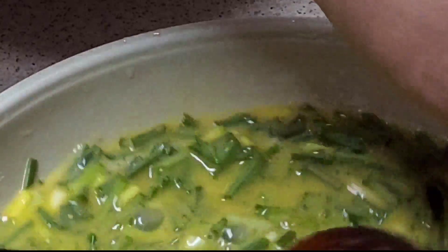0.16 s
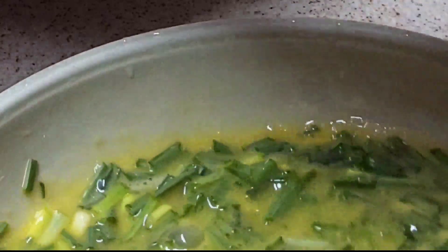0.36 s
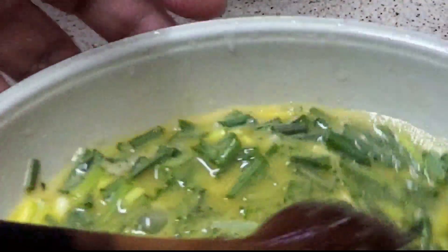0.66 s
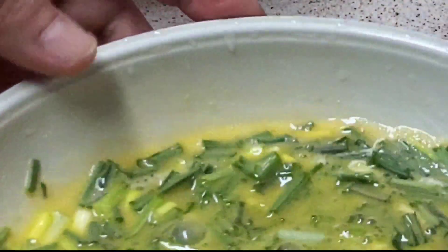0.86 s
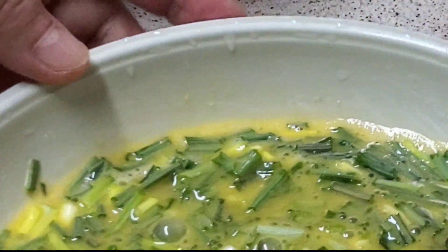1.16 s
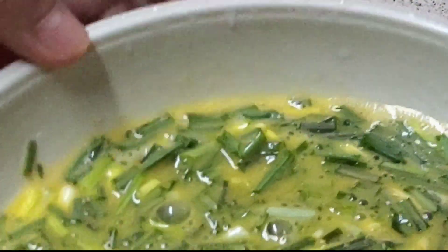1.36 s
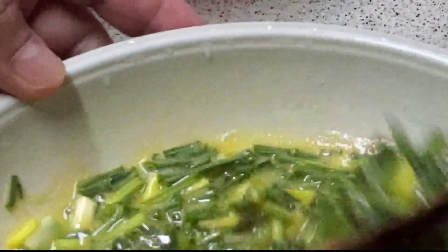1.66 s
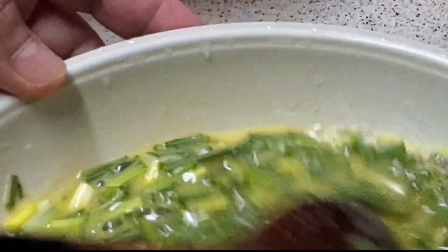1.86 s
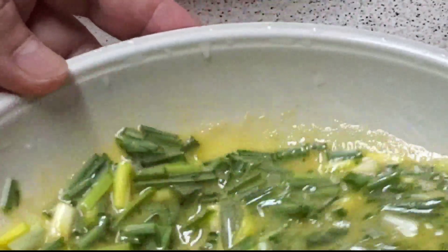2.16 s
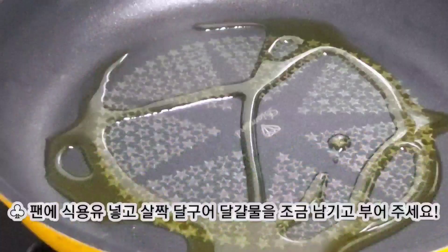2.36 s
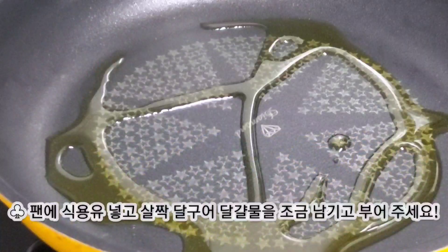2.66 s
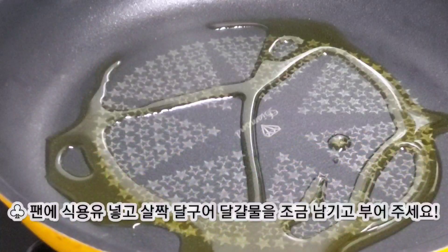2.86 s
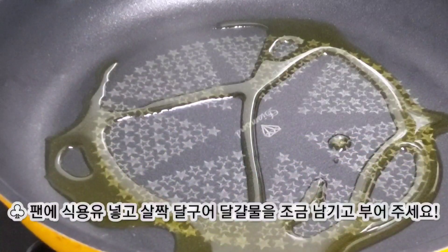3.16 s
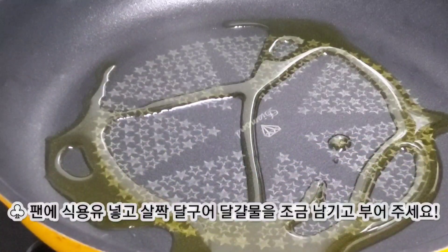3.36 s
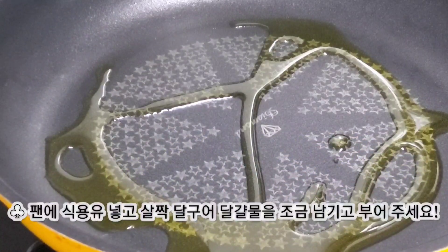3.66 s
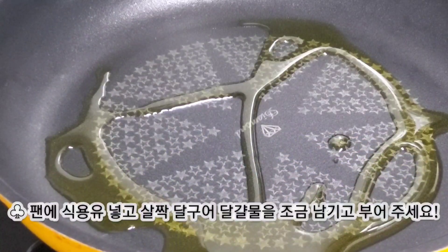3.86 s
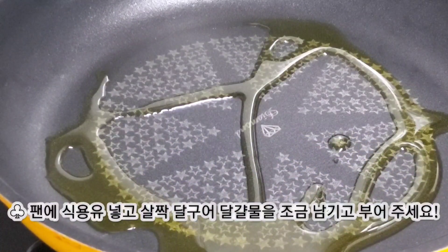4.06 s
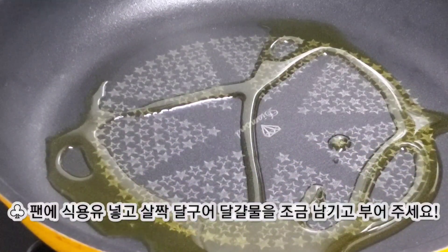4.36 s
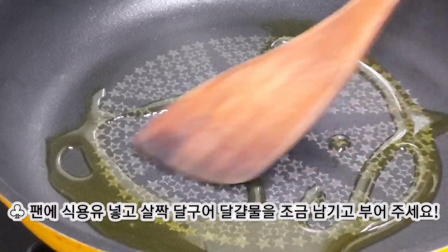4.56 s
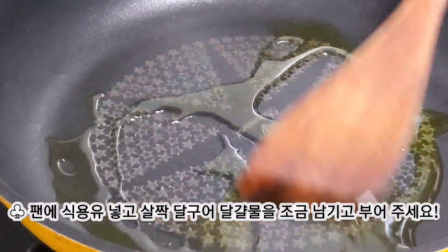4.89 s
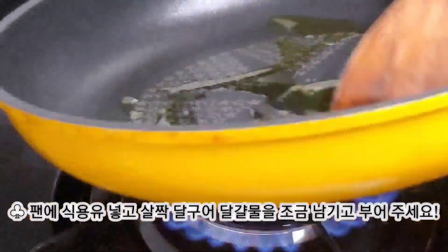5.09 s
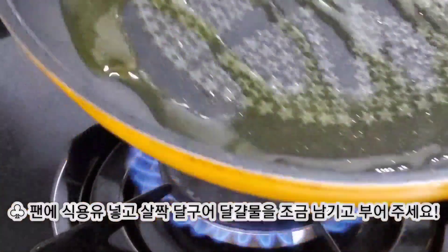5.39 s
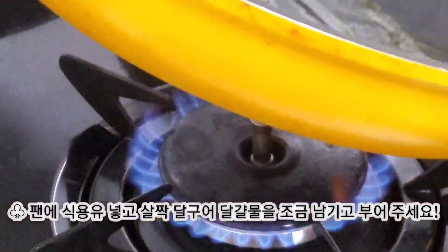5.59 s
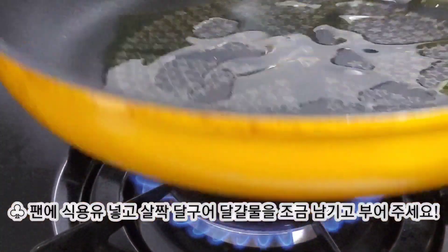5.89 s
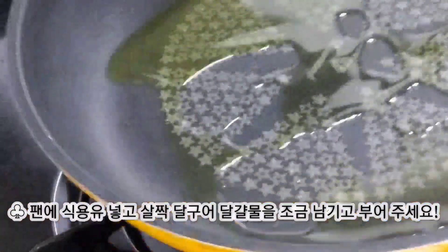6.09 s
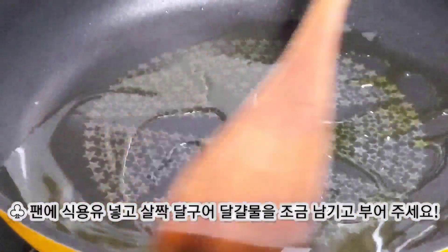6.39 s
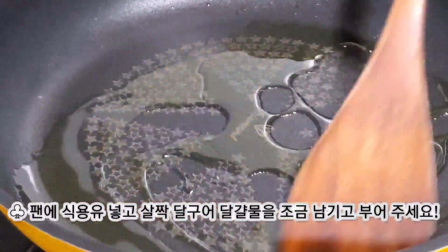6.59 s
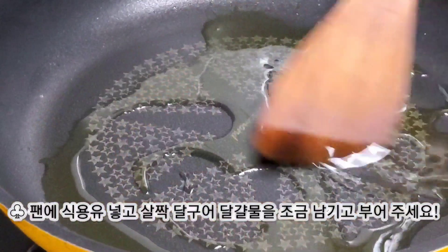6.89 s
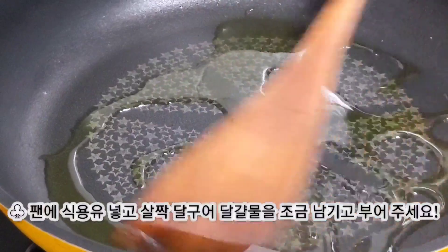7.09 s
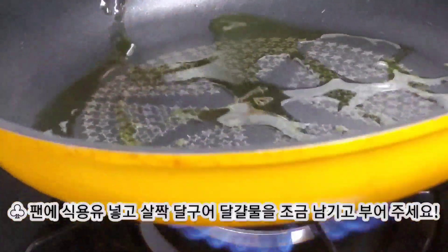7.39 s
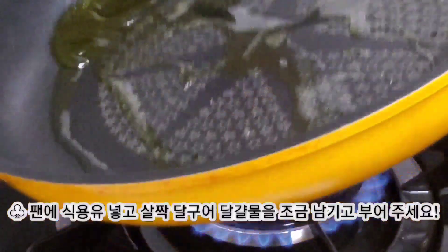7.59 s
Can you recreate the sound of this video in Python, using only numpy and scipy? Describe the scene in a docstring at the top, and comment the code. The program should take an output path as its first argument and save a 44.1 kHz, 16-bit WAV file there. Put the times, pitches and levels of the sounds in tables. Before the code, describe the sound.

Close up in a small kitchen, a wooden spoon knocks roughly every quarter second on a bowl while thick egg and chopped greens swish and crackle wetly. The sound cuts to a quiet burner hiss, a brief rattle and thud on the counter, then a wooden spatula knocking and scraping a pan, a ringing metallic rub as it tilts, and more taps and scrapes.

```python
"""Egg in a bowl, then a pan on the stove

A wooden spoon knocks on a bowl between wet swishes of egg and chives: noise bursts and bubble grains
excite the bowl's modes. Then, by a hissing gas burner, something lands on the counter and a wooden spatula
taps and scrapes an oiled pan by stick-slip friction; the pan clanks and rubs on its iron grate when tilted.
Early copies and a short diffuse tail set it in a small kitchen, over shaped background noise.
"""
import sys
import numpy as np
from scipy import signal
from scipy.fft import rfft, irfft, next_fast_len
from scipy.io import wavfile
from scipy.ndimage import uniform_filter1d, map_coordinates

SR = 44100
rng = np.random.default_rng(int(sys.argv[2]) if len(sys.argv) > 2 else 0)


def int16_out(signal):
    """Quantize to a 16-bit WAV file."""
    q = np.round(np.clip(np.atleast_2d(signal).T, -1, 1) * 32767)
    wavfile.write(sys.argv[1], SR, q.astype(np.int16))


N = 341334
TIME = np.arange(N) / SR

# edges of the registers thud, knock, clack and tick: edge_hz
BAND_EDGES = [50, 300, 1500, 5000, 15000]
# resonances of the bowl: mode_hz, width_hz, level_db
BOWL_MODES = [(235, 45, -6), (337, 68, -1.5), (617, 51, -12.5), (840, 86, -13), (1190, 48, -12),
              (1780, 140, -13), (2180, 250, -17.5), (2770, 25, -32), (3510, 36, -13), (4230, 330, -17.5),
              (5330, 80, -17), (6540, 48, -57), (7640, 83, -21.5), (8500, 66, -30)]
# dense, damped response under the bowl's resonances: frequency_hz, level_db
BOWL_BODY = [(30, -20.5), (80, -3.5), (160, -4), (400, -9.5), (700, -16), (1100, -12), (1600, -18),
             (3000, -22), (6000, -36), (11000, -33.5), (16000, -52)]
# resonances of the pan lying flat: mode_hz, width_hz, level_db
PAN_MODES = [(121, 43, 8.2), (496.0, 56, 0.5), (937, 99, 1), (1507, 43, -7.5), (2284, 74, 2.5),
             (3296, 250, -15.0), (4300, 220, -19.5), (5380, 66, -19.5), (5660, 63, -21.5),
             (6500, 68, -38.0), (6960, 140, -25.0)]
# dense, damped response under the pan's resonances: frequency_hz, level_db
PAN_BODY = [(30, -27.5), (70, -17), (170, 2.5), (240, -5.5), (330, -6.5), (600, -7.5), (1050, -11),
            (1500, -7), (2000, -18.5), (3000, -40.5), (5000, -26.5), (8000, -34.5), (12000, -39),
            (16000, -66)]
# spatula strokes: start_s, length_s, drag_db, growth_db (over the stroke),
# then above the drag: judder_db, grit_db, rim_db; and the blade's note at the start: note_hz
SCRAPES = [(4.72, .125, -43.5, -1, 2.5, -0.5, 0, 650), (4.855, 0.085, -34, 6, -11, -6.5, -3, 650),
           (4.965, 0.023, -40, -3.5, 3.5, 1.5, 1, 850), (5.015, 0.049, -48.5, 1, 8.5, -8, -6, 700),
           (5.068, 0.031, -31.5, -2, -11, -6.5, -12, 915), (5.14, 0.033, -28, 6.5, -3.5, -6, -12.5, 958),
           (5.205, .05, -32.5, 1, -7, -20, -17.5, 580), (6.44, 0.053, -38.5, -9, -4.5, -6, -4, 904),
           (6.584, 0.063, -41, -10, -5, -9.5, -1.5, 691), (6.67, 0.067, -45, -7.5, 0, 2, -8.5, 820),
           (6.777, 0.063, -36.5, 4, -14, -9.5, -5, 840), (6.897, 0.085, -35, -3, -14, -12, -10, 676),
           (7.039, 0.043, -34, 4, -14, -13, -19, 565), (7.135, 0.064, -36, -3.5, -1.5, -9.5, -7.5, 711),
           (7.233, .085, -47, -4.5, 4, 2, 5.5, 844), (7.328, 0.037, -34, -4.5, -12, -15.5, -9.5, 842),
           (7.43, 0.021, -45, -19, -2, 4, -4, 730), (7.533, 0.087, -44.5, -2.5, -0.5, -10.5, -16, 478)]
# left-right likeness of near sounds: frequency_hz, likeness (1 = identical)
NEAR_LIKENESS = [(60, 0.97), (140, 0.99), (300, 0.9), (600, 0.68), (1200, 0.093), (3000, 0.0389),
                 (8000, 0.052)]
# left-right likeness of the backgrounds and the room's tail: frequency_hz, likeness (1 = identical)
DIFFUSE_LIKENESS = [(60, 1), (130, 0.95), (290, 0.76), (640, 0.35), (1410, 0.051), (3100, -0.039),
                    (6820, -0.013), (15000, -0.08)]


def amp(db):
    """Level to amplitude: 20 dB is a factor of ten."""
    return 10 ** (np.asarray(db) / 20)


def unit(x):
    """Normalisation to rms 1."""
    return x / np.sqrt(np.mean(x ** 2) + 1e-20)


def along(points, hz):
    """Interpolation of (Hz, value) points on a logarithmic frequency axis."""
    f, v = np.transpose(points)
    return np.interp(np.log(hz + 1), np.log(f + 1), v)


def wobble(rate):
    """Smooth random modulation: a spline through rate random knots a second."""
    knots = rng.standard_normal(int(N * rate / SR) + 4)
    return map_coordinates(knots, [TIME * rate])


def shaped(x, gain):
    """Minimum-phase filtering: the response to a cause rings after it, never before."""
    n = x.shape[-1]
    half = next_fast_len(n // 2 + 4096)
    magnitude = np.maximum(gain(np.fft.rfftfreq(2 * half, 1 / SR)), 1e-6)
    cepstrum = irfft(np.log(magnitude))
    # folding the cepstrum onto positive times makes the response causal
    cepstrum[1:half] *= 2
    cepstrum[half + 1:] = 0
    return irfft(rfft(x, 2 * half) * np.exp(rfft(cepstrum)))[..., :n]


def body(broad, modes):
    """Modal response: the powers of resonance peaks add to a broad, damped response."""
    def gain(f):
        peaks = sum(amp(db) ** 2 / (1 + (2 * (f - hz) / width) ** 2) for hz, width, db in modes)
        return np.sqrt(amp(along(broad, f)) ** 2 + peaks)
    return gain


def hump(hz, centre_hz, lift_db, sharpness):
    """Single broad resonance on a log-frequency axis: a peak of lift_db added to unit gain."""
    return 1 + amp(lift_db) / (1 + (sharpness * np.log((hz + 1) / centre_hz)) ** 2)


def band(x, lo_hz, hi_hz):
    """Band-pass filtering: one register of a sound, at rms 1."""
    edges_hz = [lo_hz, min(hi_hz, SR / 2.1)]
    return unit(signal.sosfilt(signal.butter(3, edges_hz, "band", fs=SR, output="sos"), x))


def widen(pair, alike):
    """Interaural coherence: shared and opposed noise mix to the given left-right likeness."""
    likeness = lambda f: np.clip(along(alike, f), -.99, .99)
    mid = shaped(pair[0], lambda f: np.sqrt(1 + likeness(f)))
    side = shaped(pair[1], lambda f: np.sqrt(1 - likeness(f)))
    return np.array([mid + side, mid - side])


def placed(x, left_db):
    """Interaural level difference: left_db louder on the left, or on the right if negative."""
    return x * amp(np.array([[left_db], [-left_db]]) / 2)


def bowl():
    """Struck resonator: the spoon knocks on the bowl, whose ring is damped by the egg."""
    # knocks: time_s, knock_db, thud_db (above the knock), hardness_hz, spot_hz (pitch of the struck spot),
    # t60_s (of the contact)
    knocks = [(0.12, -41.5, -4.5, 4770, 445, 0.018), (0.405, -33.5, -5.5, 11000, 970, 0.11),
              (0.603, -40.5, 3, 6740, 496, 0.032), (0.731, -47, -23, 2640, 1250, 0.12),
              (0.937, -32, -9, 8500, 1000, 0.03), (1.203, -37, 1.5, 2980, 830, 0.11),
              (1.409, -54.5, 7, 1970, 626, 0.041), (1.609, -63, 26.5, 2500, 555, 0.012),
              (1.631, -67, 29, 5000, 541, 0.052), (1.789, -31, -2.5, 1550, 695, 0.06)]
    return blows(knocks, BOWL_BODY, BOWL_MODES, clack_db=-8, tick_db=-15.5, spot_db=-0.5,
                 crack_db=16, tail_db=-14.0, tail_t60=0.17, attack=0.0015)


def blows(rows, broad, modes, clack_db, tick_db, spot_db, crack_db, tail_db, tail_t60, attack):
    """Impact excitation: a brief noisy force drives the modes; spot and hardness set pitch and colour."""
    out, t = np.zeros((2, N + SR)), np.arange(SR // 4) / SR
    for s, knock_db, thud_db, hardness_hz, spot_hz, t60 in rows:
        # a fast burst, then the clatter of nearby surfaces
        decay = amp(-60 * t / t60) + amp(tail_db - 60 * t / tail_t60)
        push = decay * (1 - np.exp(-t / attack))
        force = widen(push * rng.standard_normal((2, len(t))), NEAR_LIKENESS)
        force[:, SR // 700] += amp(crack_db)  # the instant of firm contact
        ring = lambda f: body(broad, modes)(f) * hump(f, spot_hz, spot_db, sharpness=12.4)
        hit = balanced(shaped(force, ring), registers(thud_db, clack_db, tick_db, hardness_hz))
        out[:, round(s * SR):][:, :len(t)] += amp(knock_db) * hit
    return out[:, :N]


def registers(thud_db, clack_db, tick_db, hardness_hz):
    """Contact stiffness as a low-pass: a soft contact excites little above its hardness."""
    centres = np.sqrt(np.multiply(BAND_EDGES[1:], BAND_EDGES[:-1]))
    softening_db = 10 * np.log10(1 + (centres / hardness_hz) ** 4)
    return np.array([thud_db, 0, clack_db, tick_db]) - softening_db


def balanced(hit, register_db):
    """Spectral balance: the first 25 ms of a blow are steered to the given level in each register."""
    edges, size = np.array(BAND_EDGES), SR // 40
    hz = np.fft.rfftfreq(2 * size, 1 / SR)
    for _ in range(2):  # neighbouring registers overlap, so a second pass evens them out
        power = np.mean(np.abs(rfft(hit[:, :size], 2 * size)) ** 2, axis=0) / size ** 2
        own_db = [10 * np.log10(power[(hz >= lo) & (hz < hi)].sum()) for lo, hi in zip(edges, edges[1:])]
        colour = np.column_stack([np.sqrt(edges[1:] * edges[:-1]), np.subtract(register_db, own_db)])
        hit = shaped(hit, lambda f: amp(along(colour, f)))
    return hit


def egg():
    """Granular liquid noise: egg sloshes round the spoon while small bubbles and wet chives crackle."""
    # turns of the spoon: crest_s, rise_s, slosh_db, fizz_db
    turns = [(0.04, 0.11, -65.5, -73), (0.19, 0.026, -50.5, -62), (0.46, 0.022, -48.5, -64),
             (0.675, 0.032, -51.5, -72), (0.738, 0.036, -52, -60.5), (0.85, 0.012, -62.5, -79),
             (1.048, .02, -53, -61), (1.27, 0.019, -49.5, -62.5), (1.309, 0.017, -69, -62.5),
             (1.439, 0.032, -50.5, -66), (1.55, 0.033, -61.5, -70), (1.64, 0.048, -55, -67.5),
             (1.771, 0.021, -48.5, -75), (1.887, .006, -60, -59.5), (1.98, 0.016, -70, -76),
             (2.195, 0.061, -71, -66.5), (2.25, 0.048, -53, -77)]
    settle_db_per_s = 280  # the egg comes to rest after each turn
    slosh, fizz = sum(amp(levels_db)[:, None] * swell(s, rise, settle_db_per_s)
                      for s, rise, *levels_db in turns)
    gulps = grains(rate=500, spread_db=3, smooth=1)
    pops = grains(rate=2500, spread_db=4, smooth=.8)
    low = band(shaped(gulps, body(BOWL_BODY, BOWL_MODES)), 167, 1120)
    wet_colour = [(600, -14), (1500, 3), (3000, 2.5), (4500, -1), (8000, -4), (16000, -10)]  # (Hz, dB)
    wet = shaped(pops, lambda f: amp(along(wet_colour, f)))
    return slosh * low + fizz * unit(wet)


def swell(crest_s, rise_s, fall_db_per_s):
    """Motion envelope: a Gaussian rise to the crest, then exponential decay."""
    t = TIME - crest_s
    return np.exp(-(np.minimum(t, 0) / rise_s) ** 2) * amp(-fall_db_per_s * np.maximum(t, 0))


def grains(rate, spread_db, smooth):
    """Shot noise: uneven tiny slips or pops, rate a second, over a share of smooth rubbing noise."""
    sizes = amp(spread_db * np.clip(rng.standard_normal(N), -2, 2))
    events = (rng.random(N) < rate / SR) * sizes
    life = np.exp(-np.arange(SR // 200) / (SR * .0005))  # each grain decays with a 0.5 ms time constant
    envelope = unit(signal.lfilter(life, 1, events)) + smooth
    return widen(envelope * rng.standard_normal((2, N)), NEAR_LIKENESS)


def brushing():
    """Sliding friction as narrow-band noise: the spoon brushes softly along the bowl's wall."""
    # brushes: start_s, length_s, level_db
    brushes = [(0, 0.24, -76), (1.43, 0.23, -75.5)]
    pressure = sum(amp(db) * stroke(s, length, growth_db=-1) for s, length, db in brushes)
    return pressure * band(widen(rng.standard_normal((2, N)), NEAR_LIKENESS), 4300, 5750)


def plops():
    """Damped cavity tone: a blob of egg falls back with a short hollow splash over a soft bump."""
    # drops: time_s, level_db (relative), pitch_hz, t60_s
    drops = [(2.22, -23, 1105, 0.023)]
    out, t = np.zeros((2, N)), np.arange(SR // 10) / SR
    for s, db, hz, t60 in drops:
        noise = widen(rng.standard_normal((2, SR // 5)), NEAR_LIKENESS)
        splash = band(noise, hz * 0.64, hz * 1.1)[:, -len(t):]
        note = np.sin(2 * np.pi * hz * t)
        bump = np.sin(2 * np.pi * 115 * t) * amp(-5.0 - 60 * t / 0.053)
        hollow = (splash + note / 2) * amp(-60 * t / t60)
        onset = 1 - np.exp(-t / 0.00099)
        out[:, round(s * SR):][:, :len(t)] += amp(db - 2.5) * (hollow + bump) * onset
    return out


def pan():
    """Lightly damped modes: everything that touches the pan leaves a faint, long ring in its metal."""
    # the least damped modes: mode_hz, width_hz, level_db
    lingering = [(875, 6, -14.5), (2285, 8.3, -16.5), (2520, 3.6, -14)]
    contact = taps() + scraping() + squeaks() + sliding()
    ring = lambda f: sum(amp(db) / (1 + 2j * (f - hz) / width) for hz, width, db in lingering)
    size = next_fast_len(N + SR)
    return contact + irfft(rfft(contact, size) * ring(np.fft.rfftfreq(size, 1 / SR)), size)[:, :N]


def taps():
    """Impact on two resonators: the spatula hits the pan, and the pan clanks on the iron grate."""
    # blows of spatula on pan, and of pan on grate: time_s, knock_db, thud_db (above the knock),
    # hardness_hz, spot_hz (pitch of the struck spot), t60_s (of the contact)
    spatula_blows = [(4.616, -57.5, -12, 5900, 605, 0.065), (4.677, -29.5, -7, 3760, 580, 0.11),
                     (4.857, -42.5, 0, 6000, 760, 0.1), (5.125, -23, -8.5, 5400, 1110, 0.022),
                     (5.158, -33, -18, 1310, 775, 0.069), (5.411, -39.5, -14, 1250, 515, 0.04),
                     (6.425, -32, -3, 2300, 950, 0.071), (6.516, -20, -4, 7300, 1105, 0.064),
                     (6.541, -21.5, -9, 9100, 1340, 0.04), (6.549, -23.5, -6, 7000, 1047, 0.044),
                     (6.857, -35, -12, 2900, 518, 0.016), (6.942, -29.5, 2, 2700, 740, 0.042),
                     (7.132, -38, -2, 5360, 880, 0.02), (7.355, -33, -2.5, 2700, 870, 0.041),
                     (7.427, -46, -6, 12000, 1730, 0.076)]
    clanks = [(6.395, -33, -21, 3000, 2200, 0.058), (6.405, -32, -27.5, 14200, 6830, 0.029)]
    # resonances of the grate: mode_hz, width_hz, level_db
    grate_modes = [(2290, 39, -6.5), (3200, 27, -8), (4280, 27, -10), (5480, 250, 0.5), (7100, 15, -25),
                   (8200, 21, -6.5), (8340, 92, 6.5), (8350, 45, -7.5), (10500, 75, -12.5),
                   (13200, 180, -12)]
    # dense, damped response under them: frequency_hz, level_db
    grate_body = [(40, -16), (110, 5.5), (300, -21), (1500, -16), (6000, -1.5), (12000, -2.5),
                  (16000, -20.5)]
    wood = blows(spatula_blows, PAN_BODY, PAN_MODES, clack_db=1.5, tick_db=-6, spot_db=9.5,
                 crack_db=3, tail_db=-25.5, tail_t60=0.19, attack=0.0019)
    iron = blows(clanks, grate_body, grate_modes, clack_db=7, tick_db=7, spot_db=-2.5,
                 crack_db=1.0, tail_db=-34.5, tail_t60=0.122, attack=0.002)
    return placed(wood, left_db=-0.2) + placed(iron, left_db=-1.0)


def scraping():
    """Stick-slip friction: the wooden edge drags over the oiled, textured pan, which rumbles as it rocks."""
    # rocking of the pan on its support under a heavy stroke: start_s, length_s, level_db, growth_db
    rocking = [(5.075, .16, -31, 4), (6.436, 0.027, -27.5, -6.5), (7.364, 0.088, -36.5, -7),
               (7.549, 0.12, -43, -14.5)]
    # the spatula trembles in the hand as it drags: the low and high edge of that band, edge_hz
    judder_band = (150.6, 240)
    chatter_db, chatters_per_s = 1.5, 130  # the edge catches and frees itself unevenly
    flare_db, flares_per_s = 2, 36  # the rim sings in uneven flashes
    drag_reach = 2.41  # top of the drag noise, in multiples of the blade's note

    slips = grains(rate=1500, spread_db=4, smooth=.6)
    slips = slips * amp(chatter_db * wobble(chatters_per_s))
    rub = travelling(shaped(slips, body(PAN_BODY, PAN_MODES)), blade_db=3, patchy_db=2.5)
    # the rim's strongest mode is taken out of the drag, to have its own level in each stroke
    rim = signal.lfilter(*signal.iirpeak(2300, 10, fs=SR), rub)
    singing = placed(unit(rim * amp(flare_db * wobble(flares_per_s))), left_db=-1.5)
    judder = band(rub, *judder_band)
    grit = band(rub, 3110, SR / 2)
    rumble = band(rub, 41, 170)
    out = rumble * sum(amp(db) * stroke(s, length, growth_db) for s, length, db, growth_db in rocking)
    for s, length, db, growth_db, judder_db, grit_db, rim_db, note_hz in SCRAPES:
        drag = band(rub - rim, 378, drag_reach * note_hz)
        parts = drag + amp(judder_db) * judder + amp(grit_db) * grit + amp(rim_db) * singing
        out += amp(db) * stroke(s, length, growth_db) * parts
    return out


def stroke(start_s, length_s, growth_db):
    """Friction follows pressure: wood takes hold, drags with growing or easing force, and lets go."""
    grip_s, let_go_db_per_s = 0.035, 327.5
    t = TIME - start_s
    grip = np.clip(t / grip_s + .5, 0, 1)
    pressure_db = growth_db * (np.clip(t / length_s, 0, 1) - .5)
    return grip * amp(pressure_db - let_go_db_per_s * np.maximum(t - length_s, 0))


def travelling(rub, blade_db, patchy_db):
    """Moving excitation point: the note glides while some pan modes wake and others are damped."""
    hz, t, z = signal.stft(rub, SR, nperseg=1024)
    field = uniform_filter1d(rng.standard_normal(z.shape[1:]), size=4, axis=0)  # smooth over frequency
    field = uniform_filter1d(field, size=6, axis=1)  # and over time
    depth_db = patchy_db / (1 + hz[:, None] / 8000)  # the fine hiss is more even
    note = hump(hz[:, None], blade_note(t), blade_db, sharpness=2.3)
    return signal.istft(z * note * amp(depth_db * unit(field)), SR, nperseg=1024)[1][:, :N]


def blade_note(t):
    """Gliding resonance: the blade's note (Hz) starts anew with each stroke and sinks until it ends."""
    sag_oct_per_s = 2.9  # the note sinks as the blade flattens
    ends = [(s + u, hz * 2 ** (-sag_oct_per_s * u)) for s, length, *_, hz in SCRAPES for u in (0, length)]
    return np.interp(t, *np.transpose(sorted(ends)))


def sliding():
    """Friction-driven modes: tilted, the pan rubs on the grate and its bell modes sing more freely."""
    # slides: crest_s, rise_s, ring_db, grit_db
    slides = [(5.313, 0.045, -32.5, -51), (5.518, 0.048, -32, -50), (5.61, 0.029, -58, -58.5),
              (5.801, 0.056, -45, -58)]
    # resonances of the tilted pan: mode_hz, width_hz, level_db
    tilted_modes = [(514.8, 19.9, 8), (909, 23.8, 5.5), (1463, 64, -10), (1747, 22.2, -8.5),
                    (2265, 51, -10.5), (3360, 110, -27.5)]
    # dense, damped response under them: frequency_hz, level_db
    tilted_body = [(60, 14.5), (300, -36), (700, -6), (1500, -31), (3000, -29.5), (6000, -41), (16000, -55)]
    stop_db_per_s = 240.5  # the pan comes to rest after each slide
    ring, grit = sum(amp(levels_db)[:, None] * swell(s, rise, stop_db_per_s)
                     for s, rise, *levels_db in slides)
    slips = grains(rate=3000, spread_db=3, smooth=1)
    rub = travelling(shaped(slips, body(tilted_body, tilted_modes)), blade_db=-31, patchy_db=2)
    # friction holds each mode at a steady strength while its phase wanders
    wander = lambda width: np.cumsum(rng.standard_normal(N)) * np.sqrt(np.pi * width / SR)
    bell = unit(sum(amp(db) * np.sqrt(width) * np.sin(2 * np.pi * hz * TIME + wander(width))
                    for hz, width, db in tilted_modes))
    singing = amp(-6.5) * bell + amp(-3.5) * band(rub, 164, 3100)
    return ring * singing + grit * band(rub, 3380, SR / 2)


def squeaks():
    """Friction squeal: the wood catches and sings briefly as noise in a narrow band."""
    # squeaks: start_s, level_db, pitch_hz, length_s
    catches = [(4.857, -38, 1743, 0.03), (5.057, -39, 1755, 0.021), (6.723, -44, 3600, 0.0302),
               (7.552, -56, 5860, 0.081)]
    out = np.zeros((2, N))
    for s, db, hz, length in catches:
        envelope = np.hanning(int(length * SR))
        noise = rng.standard_normal((2, SR // 4))
        voice = band(noise, hz / 1.03, hz * 1.03)[:, -len(envelope):]
        out[:, round(s * SR):][:, :len(envelope)] += amp(db) * envelope * voice
    return out


def counter():
    """Struck slab: a utensil rattles out of sight, and something lands on the counter with a thud."""
    # contacts: time_s, knock_db, thud_db (above the knock), hardness_hz, spot_hz (pitch of the struck spot),
    # t60_s (of the contact)
    contacts = [(2.908, -54, 4, 3500, 1020, 0.13), (2.926, -50, 3.5, 11000, 2050, 0.19),
                (2.955, -53.5, 3, 4800, 1830, 0.11), (2.978, -45.5, 3.5, 12000, 2580, 0.043),
                (3.217, -50, -1, 5500, 1210, 0.08), (3.246, -37.5, -6, 2980, 2100, 0.09),
                (3.265, -46.5, 18.5, 1390, 794, 0.041), (3.289, -26.5, -1, 1290, 665, 0.043),
                (3.303, -42.5, 17, 1510, 556, 0.049), (4.025, -66.5, -10, 3500, 3340, 0.2)]
    # resonances of the counter: mode_hz, width_hz, level_db
    counter_modes = [(108, 38, 8), (433, 24, -1), (2370, 76, -15.5), (5170, 300, -24.5)]
    # dense, damped response under them: frequency_hz, level_db
    counter_body = [(30, -1), (90, 6.5), (230, -8.5), (400, -7), (700, -12), (1500, -14.5), (2000, -21.5),
                    (3500, -26.5), (7000, -35), (16000, -46)]
    return blows(contacts, counter_body, counter_modes, clack_db=5, tick_db=-0.5, spot_db=7.0,
                 crack_db=9, tail_db=-7.5, tail_t60=0.13, attack=0.0021)


def hood(x, echo_db):
    """Early reflections: worktop, tiles and hood return a few copies, different at each ear."""
    size = SR // 60
    echoes = np.zeros((2, size))
    for ear in echoes:
        ear[rng.integers(size // 6, size, size=8)] = amp(echo_db) * rng.choice([-1, 1], size=8)
    # small surfaces reflect little bass
    bright = signal.sosfilt(signal.butter(2, 400, "high", fs=SR, output="sos"), x)
    return signal.fftconvolve(bright, echoes, axes=1)[:, :N]


def kitchen(x):
    """Diffuse reverberation: decaying noise as the walls' answer, with its own decay at each frequency."""
    # reverberation time: frequency_hz, t60_s
    decay_times = [(100, 0.51), (1000, 0.079), (5000, 0.12), (15000, 0.076)]
    hz, t, z = signal.stft(rng.standard_normal((2, SR // 2)), SR, nperseg=256)
    decay = amp(-60 * t / along(decay_times, hz)[:, None])
    tail = signal.istft(z * decay, SR, nperseg=256)[1]
    tail = np.pad(widen(tail, DIFFUSE_LIKENESS), ((0, 0), (SR // 150, 0)))  # the walls answer late
    return signal.fftconvolve(x, tail / np.linalg.norm(tail[0]), axes=1)[:, :N]


def background():
    """Spectrally shaped noise: quiet room air at the bowl; at the stove, the hiss of the burner."""
    # spectra, relative: frequency_hz, density_db (per Hz)
    room_spectrum = [(13, -51), (22, -5.5), (92, 6.5), (242, -14), (398, -13.5), (469, -9.5), (672, -23),
                     (988, -26.5), (1380, -37), (1710, -35), (5770, -45.5), (10600, -40.5), (16000, -50)]
    burner_spectrum = [(22, -8.5), (43, -14), (102, -2), (167, -14), (200, -16), (340, -22), (700, -26.5),
                       (1050, -30.5), (1350, -39), (1700, -36.5), (2300, -33.5), (4200, -29.5), (7000, -36),
                       (15500, -39)]
    room_db, burner_db = -55.5, -55
    stove_from_s = 2.402  # the scene moves to the stove

    def air(spectrum):
        noise = widen(rng.standard_normal((2, N)), DIFFUSE_LIKENESS)
        return unit(shaped(noise, lambda f: amp(along(spectrum, f))))

    room = amp(room_db) * air(room_spectrum)
    burner = amp(burner_db + 0.1 * wobble(54)) * air(burner_spectrum)  # with a very slight flutter
    return np.where(TIME < stove_from_s, room, burner)


def scene():
    """Superposition: direct sounds, their early copies and diffuse tail, and the background."""
    at_bowl = placed(bowl() + egg() + brushing() + plops(), left_db=-0.6)
    near = at_bowl + placed(counter(), left_db=0.3) + pan()
    return near + hood(near, echo_db=-22.5) + amp(-17.5) * kitchen(near) + background()


def record(dry):
    """Band limitation: an ideal low-pass removes everything from the top frequency upwards."""
    top_hz = 15900
    size = next_fast_len(N + SR // 2)
    return irfft(rfft(dry, size) * (np.fft.rfftfreq(size, 1 / SR) < top_hz), size)[:, :N]


dry = scene()
out = record(dry)
int16_out(out)
```